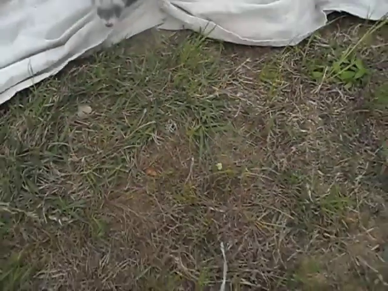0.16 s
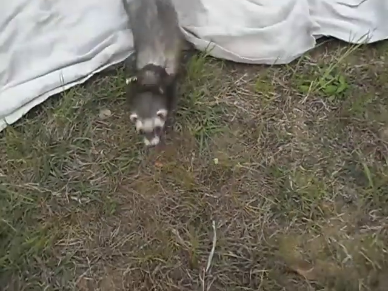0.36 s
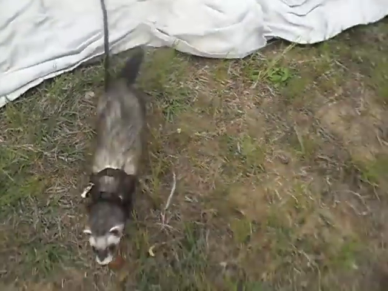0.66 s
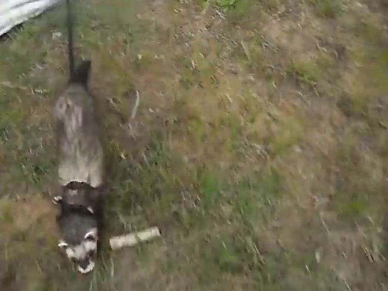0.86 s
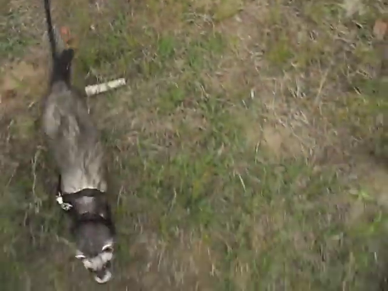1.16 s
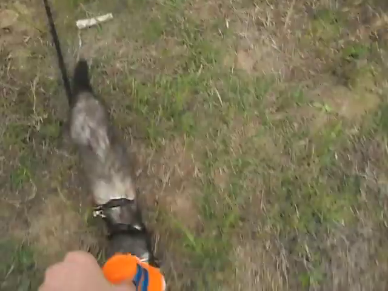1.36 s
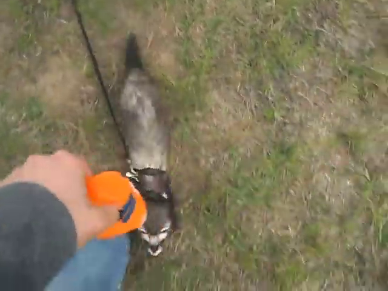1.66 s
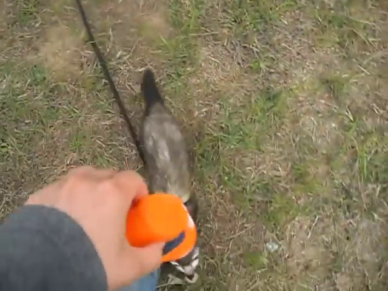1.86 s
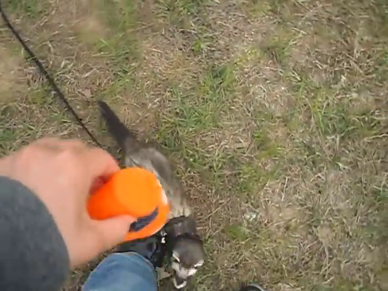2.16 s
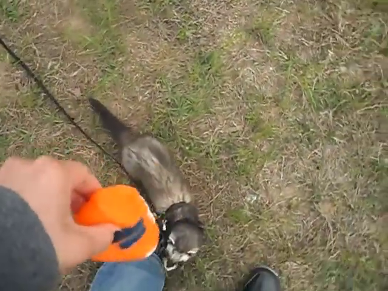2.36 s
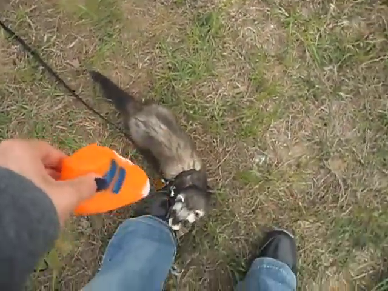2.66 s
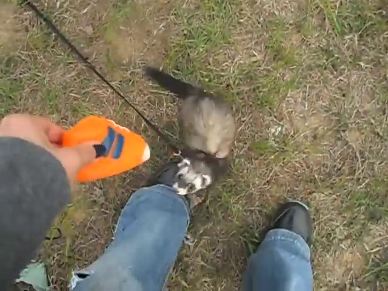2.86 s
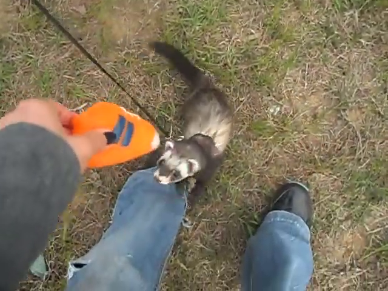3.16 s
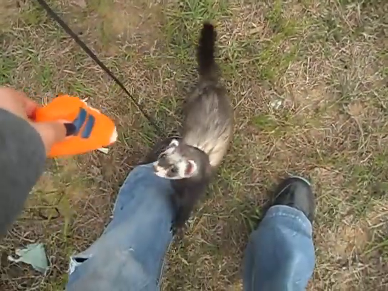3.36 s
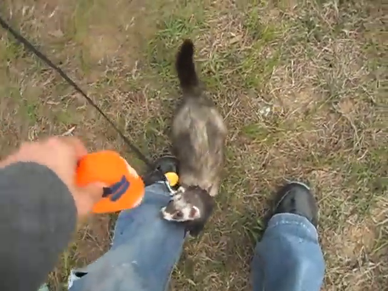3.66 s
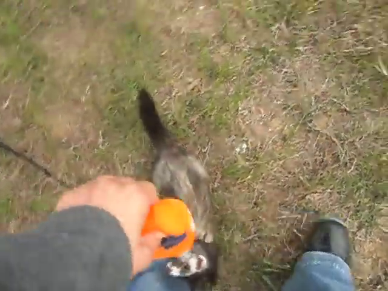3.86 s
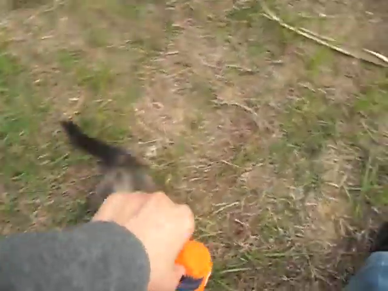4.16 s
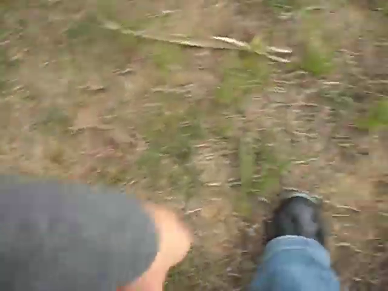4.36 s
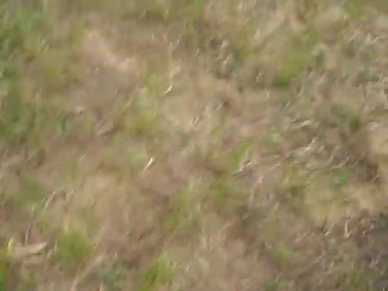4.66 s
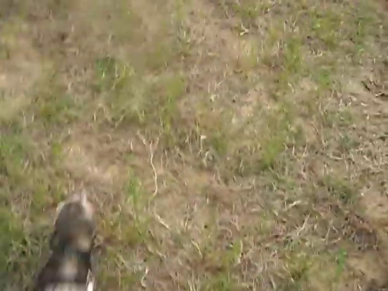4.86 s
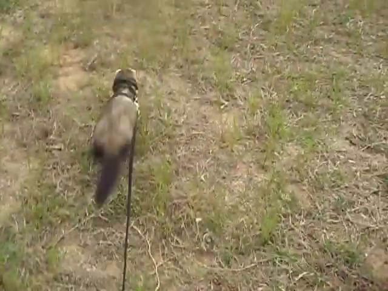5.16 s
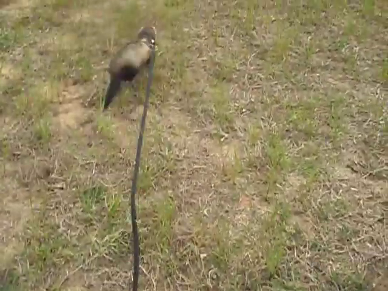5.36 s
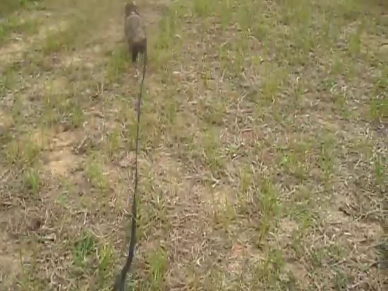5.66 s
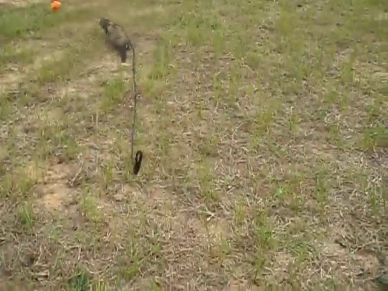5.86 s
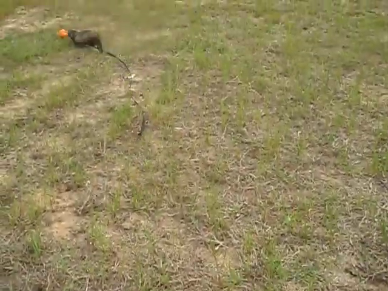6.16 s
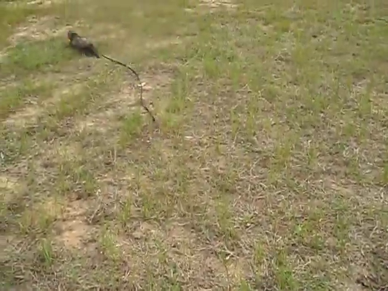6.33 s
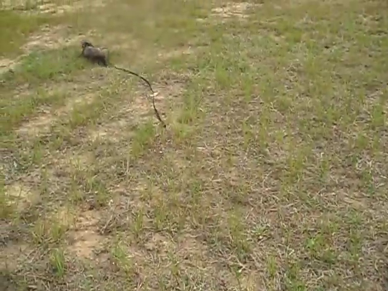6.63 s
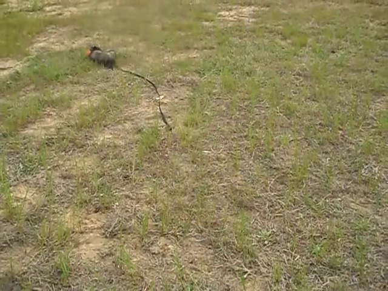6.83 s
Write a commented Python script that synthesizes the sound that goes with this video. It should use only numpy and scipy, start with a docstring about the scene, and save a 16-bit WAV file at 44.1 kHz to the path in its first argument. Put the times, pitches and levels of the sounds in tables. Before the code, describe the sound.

Outdoors on dry grass, light wind bumps and rumbles at a close microphone throughout. At 0.3 s a rubber toy gives a single short, nasal squeak as it draws in air. From 0.5 to 1.1 s clothing swishes, grass crunches and a ferret's tiny bell tinkles faintly, with a very weak squeak near 0.9. At about 1.2 s rapid squeezing begins: brief, bright, reedy chirps, each followed by a slightly higher refill chirp, until 1.9 s. A short gap holds rustling, a tick and faint tinkles. From 2.5 to 4.8 s the paired squeaks return, several a second, with small ticks and soft bumps among them; the last refill squeak is longer and louder, sliding down. Around 5 s the bell and leash clip jingle quickly as the animal trots off. A hard, dry click lands at 5.4 s, then bumps, sparse tinkles, grass rustle and wind fade on to the end, near 7 s.

```python
"""Outdoors on dry grass, close to the microphone, in light wind that bumps it from start to end.
First a rubber toy's reed squeaks as air flows back in; then grass and clothes rustle and a ferret's bell tinkles.
From about 1.2 to 4.8 s the toy is squeezed over and over: a squeak on each squeeze, a higher one on each refill.
Small ticks and soft bumps fall among them. After the last squeak the bell tinkles on, and near 5.4 s
a hard click sounds; rustling and wind remain."""
import sys
import numpy as np
from scipy import signal
from scipy.fft import rfft, irfft
from scipy.io import wavfile
from scipy.ndimage import uniform_filter1d

SR = 44100
rng = np.random.default_rng(int(sys.argv[2]) if len(sys.argv) > 2 else 0)


def log_audio(samples):
    """Write samples as a 16-bit WAV file to the path given in sys.argv[1]."""
    # one column per channel
    frames = np.atleast_2d(samples).T
    # limit to full scale, then quantise
    limited = np.clip(frames, -1, 1)
    pcm = np.round(limited * 32767).astype(np.int16)
    wavfile.write(sys.argv[1], SR, pcm)


N = 308323
TIME = np.arange(N) / SR  # s

# Faint air of the open place, far off. Each row: frequency in Hz, relative level in dB.
AIR_SPECTRUM = [(150, 2.5), (300, -1), (500, -3), (700, -5), (810, 2.5), (950, -6.5), (1500, -10),
                (3000, -15), (6000, -16.5), (10200, -20), (12500, -24.5)]
# Deep wind rumble at the microphone. Each row: frequency in Hz, relative level in dB.
RUMBLE_SPECTRUM = [(4, -45), (15, -0.5), (30, 10), (55, 1.5), (80, -9), (160, -43), (1000, -100)]
# Wind flutter at the microphone, higher than the rumble. Each row: frequency in Hz, relative level in dB.
FLUTTER_SPECTRUM = [(20, -47), (45, -9.5), (80, 4), (120, -2), (200, -6.5), (300, -18.5), (600, -66),
                    (3000, -99)]
# Eddies striking the microphone. Each row: start in seconds, length in seconds, rumble in dB, flutter in dB.
GUSTS = [(0.362, 0.12, -50.5, -59), (2.173, 0.113, -56, -70), (2.703, .09, -48, -57.5),
         (2.795, .14, -52, -58.5), (3.31, 0.094, -52, -60), (3.678, 0.072, -46, -47.5),
         (3.926, 0.215, -46.5, -56), (4.197, 0.068, -48, -63), (5.217, 0.11, -46.5, -59),
         (5.476, 0.12, -48.5, -57.5), (5.6, 0.14, -45, -75), (5.873, 0.17, -44, -62),
         (6.312, 0.23, -49, -75)]
AIR_START_DB, RUMBLE_REST_DB = -65, -57.5
FLUTTER_START_DB, FLUTTER_REST_DB, FLUTTER_SETTLE_S = -54, -63.5, 2.53

# Rubbing cloth. Each row: frequency in Hz, relative level in dB.
CLOTH_SPECTRUM = [(100, -6), (250, -2), (500, -1), (1000, -0.5), (2000, -9.5), (4000, -24.5),
                  (10000, -26.5), (12000, -55)]
# Dry blades snapping. Each row: frequency in Hz, relative level in dB.
GRASS_SPECTRUM = [(300, -28.5), (1000, -13), (2500, 5), (4000, 2.5), (7000, 5), (10200, 2.5)]
# Sleeves and trouser legs swish. Each row: start in seconds, length in seconds, level before trim in dB.
SWISHES = [(0, .22, -71.5), (.47, 0.12, -70), (.76, .14, -59.5), (.9, 0.064, -64), (1.24, 0.33, -69.5),
           (1.748, 0.072, -52), (1.8, 0.15, -64.5), (1.96, 0.28, -60.5), (3.74, 0.045, -62.5),
           (4.02, 0.15, -70), (4.42, 0.185, -68), (4.85, 0.275, -86), (5.25, 0.061, -78),
           (5.43, 0.053, -65)]
# Grass crunches under a foot or the leash. Each row: start in seconds, length in seconds, level before trim in dB.
CRUNCHES = [(.488, 0.026, -53), (.61, 0.033, -64), (.77, 0.21, -72), (1.955, 0.1, -58.5),
            (2.07, 0.1157, -64), (3.742, 0.0406, -57.5), (4.42, 0.066, -62.5), (4.986, 0.021, -50.5),
            (5.048, 0.037, -62), (5.255, 0.039, -57), (5.45, 0.036, -70.5), (5.65, 0.0485, -66),
            (5.8, 0.07, -68), (6.03, .08, -69), (6.55, .06, -79.5)]
CLOTH_REST_DB, GRASS_REST_DB = -78.5, -81.5  # the faint stir in between
GRAINS_PER_S, SWISH_UNREST_DB = 2000, 1.5

# Hard ticks and clicks by the microphone. Each row: start in seconds, tick peak in dB, low knock peak in dB.
TICKS = [(0.5314, -40.5, -66.5), (1.1533, -32, -48.5), (2.008, -34.5, -58), (2.416, -62.5, -44),
         (3.749, -34, -43), (4.43, -45, -66), (4.459, -38, -64), (5.3914, -24.5, -30.5),
         (5.3923, -32.5, -43), (5.3944, -33, -43.5)]
# Bright plastic modes of a tick. Each row: frequency in Hz, relative level in dB, 60 dB decay in seconds.
TICK_MODES = [(2160, -14, 0.0093), (3700, -2, 0.0009), (5390, 1.5, 0.0034), (6240, 2.5, 0.00654),
              (7130, -5, 0.0032), (9500, -29, 0.0033)]
# Low modes of the knock under it. Each row: frequency in Hz, relative level in dB, 60 dB decay in seconds.
KNOCK_MODES = [(170, -11.5, 0.0079), (358, 19, 0.005), (590, 0.5, 0.017), (1170, -5, 0.021)]
# Soft bumps of the hand-held microphone. Each row: start in seconds, peak in dB.
BUMPS = [(2.733, -39), (3.714, -33.5), (4.049, -37.5), (4.125, -39.5), (5.509, -37.5), (5.659, -49),
         (5.985, -40.5)]
# Dull modes of a bump. Each row: frequency in Hz, relative level in dB, 60 dB decay in seconds.
BUMP_MODES = [(71.4, 30, 0.077), (122, -15, 0.074)]

# The ferret trots and its harness trembles. Each row: start in seconds, length in seconds, bell peak in dB.
TROTS = [(0.544, 0.73, -73.5), (1.902, 0.49, -66), (4.847, 0.41, -67.5), (5.406, 1, -68.5)]
# The clearest bell strikes. Each row: start in seconds, peak of the ringing in dB.
JINGLES = [(0.631, -51), (0.7677, -61), (0.842, -52), (1.0967, -53), (2.0592, -57), (4.9615, -56.5),
           (5.0028, -45.5), (5.0559, -52), (5.104, -53), (5.2172, -51), (5.2726, -48.5), (5.46, -46.5),
           (5.6263, -55), (5.8735, -59), (6.1499, -60)]
# The leash clip clinks. Each row: start in seconds, peak of the ringing in dB.
CLINKS = [(0.5846, -63), (0.8719, -64), (1.077, -61.5), (3.7188, -49), (5.029, -56), (5.4444, -64),
          (5.6156, -63), (5.7536, -60.5), (6.22, -56)]
# Modes of the tiny bell. Each row: frequency in Hz, relative level in dB, 60 dB decay in seconds.
BELL_MODES = [(6300, -35.5, .06), (7080, -8, 0.062), (8050, -25, 0.054), (9100, -21.5, 0.046)]
# Modes of the leash clip. Each row: frequency in Hz, relative level in dB, 60 dB decay in seconds.
CLIP_MODES = [(6050, -9.5, 0.058), (6780, -15.5, 0.043)]
JOLTS_PER_S = 18

# The toy is squeezed. Each row: start in seconds, length in seconds, top pitch in Hz, moment of top pressure 0-1,
# pitch fall 0-1, level before trim in dB, tilt in dB per octave, reflection delay in ms, reflection share 0-1,
# notch in Hz, notch depth in dB.
SQUEEZES = [(1.157, 0.093, 827.4, 0.29, 0.17, -44, 2.05, 0.096, 0.62, 7410.0, 2.5),
            (1.41, 0.07, 811.6, 0.19, 0.11, -45, 2.0, 0.13, 0.64, 6520.0, 10.5),
            (1.639, 0.068, 814.3, 0.23, 0.11, -41.5, 1.8, 1.1, 0.2, 3100, 10.5),
            (2.503, 0.06634, 799.6, 0.2, 0.09, -42.5, 2.5, 0.13, 0.5, 6670, 12),
            (2.7665, 0.062, 796, 0.16, 0.1, -42.5, 1.6, 0.296, 0.33, 2900.0, 11.5),
            (3.2595, 0.0739, 810.5, 0.21, 0.1, -42, 3, 1.13, 0.16, 5420, 3),
            (3.524, 0.056, 798.4, 0.17, 0.1, -42.5, 2, 0.842, 0.44, 1970, 7),
            (3.774, 0.0665, 802.5, 0.2, 0.1, -41.5, 2, 0.84, 0.12, 3224, 12.5),
            (4.077, 0.07694, 805.1, 0.28, 0.11, -44, 0.5, 0.51, 0.2, 5940, 13.5),
            (4.346, 0.077, 821, 0.29, 0.14, -42.5, 1, 0.34, 0.26, 5497, 8)]
# A half-hearted squeeze. Each row: start in seconds, length in seconds, top pitch in Hz, moment of top pressure
# 0-1, pitch fall 0-1, level before trim in dB, tilt in dB per octave, reflection delay in ms,
# reflection share 0-1, notch in Hz, notch depth in dB.
NUDGES = [(.944, 0.0338, 733.2, 0.215, 0.042, -59, -4.5, 0.463, 0.53, 4400, 5.7)]
# The toy draws air back in. Each row: start in seconds, length in seconds, top pitch in Hz, moment of top pressure
# 0-1, pitch fall 0-1, level before trim in dB, tilt in dB per octave, reflection delay in ms,
# reflection share 0-1, notch in Hz, notch depth in dB.
REFILLS = [(0.3065, 0.091, 947, 0.25, 0.18, -41, -1.42, 0.65, 0.21, 3095, 18),
           (1.2955, 0.065, 979, 0.29, 0.13, -42.5, 0.7, 0.07, 0.41, 4840, 3.6),
           (1.5265, 0.063, 977, 0.31, 0.072, -41, 0.4, 0.13, 0.51, 8885, 9.3),
           (1.7555, 0.14, 984, 0.2, 0.15, -39, -0.8, 0.65, 0.23, 2883, 14.5),
           (2.644, 0.058, 955, 0.16, 0.11, -42.5, 0.1, 0.3, 0.626, 2950, 15),
           (2.8935, 0.0584, 962, 0.256, 0.11, -39.5, -2, 0.4705, 0.46, 1980, 23.5),
           (3.1485, 0.057, 955, 0.27, 0.1, -41.3, 2.5, 0.065, 0.46, 1816, 13.4),
           (3.4005, 0.0586, 969.6, 0.24, 0.097, -39, -0.6, 0.78, 0.17, 1510, 28),
           (3.6465, 0.0681, 967, 0.26, 0.088, -41, 1.3, 1.208, 0.28, 2000, 13),
           (3.9035, 0.085, 980, 0.26, 0.118, -41.5, 1.5, 0.83, 0.46, 3962, 22.5),
           (4.2095, 0.0963, 986, 0.3, 0.13, -42.5, 0.5, 1.056, 0.38, 7100, 16),
           (4.4765, 0.072, 960.4, 0.18, 0.073, -42, -0.9, 0.89, 0.51, 5000, 26),
           (4.7095, 0.13, 986.6, 0.0355, 0.15, -35.5, 0.5, 0.85, 0.17, 3720, 9.7)]
# Colour of the reed with air going out. Each row: frequency in Hz, level in dB.
OUT_SPECTRUM = [(800, 1.2), (1600, -3), (2400, -6), (3200, -7.1), (4000, -7), (4800, -2.3), (5600, 5),
                (6400, 1), (7200, -9.5), (7900, -14.5), (8500, -17.5), (10300, -25.5), (12500, -30)]
# Colour of the reed with air coming in. Each row: frequency in Hz, level in dB.
IN_SPECTRUM = [(900, -3), (1900, -6.5), (2900, -10), (3900, -7.5), (4800, -10.5), (5700, -16), (6900, -14),
               (7700, -16), (8350, -18), (8900, -15), (9450, -22), (9850, -19), (12500, -36)]
WAVER_DB, RIPPLE_DB = 1.6, 6
JITTER = 0.0012  # share of the pitch
BLOOM = 0.35  # how strongly a small swing loses its overtones

# High treble of the microphone. Each row: frequency in Hz, gain in dB.
MICROPHONE_RESPONSE = [(10200, 0), (11100, -16), (12500, -14)]
TOP_HZ = 12100


def undb(db):
    """Decibels to gain."""
    return 10 ** (np.asarray(db) / 20)


def unit(x):
    """Scale to rms 1."""
    return x / np.sqrt(np.mean(x ** 2))


def add(out, s, sound):
    """Mix a sound in at time s."""
    i = int(s * SR)
    out[i:i + len(sound)] += sound[:N - i]


def gain_at(points, hz):
    """Read a (Hz, dB) spectrum as gain on a log-frequency axis."""
    f, db = np.transpose(points)
    return undb(np.interp(np.log(np.maximum(hz, 1)), np.log(f), db))


def equalize(x, points):
    """Filter by a (Hz, dB) spectrum without shifting phase."""
    return irfft(rfft(x) * gain_at(points, np.fft.rfftfreq(N, 1 / SR)), N)


def colour(x, points):
    """Shape a signal by a spectrum; rms 1."""
    return unit(equalize(x, points))


def causal(points, size=2048):
    """Frequencies and minimum-phase response of a passive resonator with this spectrum."""
    hz = np.fft.rfftfreq(size, 1 / SR)
    # folding the cepstrum forward makes the response causal
    cepstrum = irfft(np.log(gain_at(points, hz)))
    cepstrum[1:size // 2] *= 2
    cepstrum[size // 2 + 1:] = 0
    return hz, np.exp(rfft(cepstrum))


def walk(rate, count=N):
    """Smooth random wander with rms 1, taking rate steps a second."""
    k = max(int(SR / rate), 1)
    steps = np.repeat(rng.standard_normal(count // k + 1), k)
    return unit(uniform_filter1d(uniform_filter1d(steps, k), k)[:count])


def ring(modes, length=.4):
    """Decaying modes after one blow, peak 1."""
    t = np.arange(int(length * SR)) / SR
    y = sum(undb(db - 60 * t / t60) * np.sin(2 * np.pi * hz * t) for hz, db, t60 in modes)
    return y / np.abs(y).max()


def ramps(t, length, attack_s, release_s):
    """Straight rise, hold and straight fall."""
    return np.minimum(t / attack_s, 1) * np.minimum((length - t) / release_s, 1)


def swells(table, attack_s, release_s):
    """Gain over time for rows (s, length s, dB): each rises, holds and falls away; overlaps add in power."""
    power = np.zeros(N)
    for s, length, db in table:
        t = TIME[:int(length * SR)]
        add(power, s, (undb(db) * ramps(t, length, attack_s, release_s)) ** 2)
    return np.sqrt(power)


def outdoors(fade_db=2, unrest_db=0.66):
    """A light breeze and its eddies buffet the microphone over a faint distant background that slowly sinks."""
    breeze = undb(unrest_db * walk(7))
    # the steady flutter dies down towards its resting level
    settling_db = FLUTTER_REST_DB + (FLUTTER_START_DB - FLUTTER_REST_DB) * np.exp(-TIME / FLUTTER_SETTLE_S)
    rumble_gusts = swells([(s, length, db) for s, length, db, _ in GUSTS], attack_s=0.0205, release_s=0.028)
    flutter_gusts = swells([(s, length, db) for s, length, _, db in GUSTS], attack_s=0.06, release_s=.04)
    # gusts and steady breeze add in power
    rumble_gain = np.hypot(rumble_gusts, breeze * undb(RUMBLE_REST_DB))
    flutter_gain = np.hypot(flutter_gusts, breeze * undb(settling_db))
    rumble = rumble_gain * colour(rng.standard_normal(N), RUMBLE_SPECTRUM)
    flutter = flutter_gain * colour(rng.standard_normal(N), FLUTTER_SPECTRUM)
    air_db = AIR_START_DB - fade_db * TIME / TIME[-1] + .5 * walk(1.82)
    air = undb(air_db) * colour(rng.standard_normal(N), AIR_SPECTRUM)
    return rumble + flutter + air


def rustle(cloth_db=-2, grass_db=-1, grain_db=3):
    """Cloth swishes as wavering noise while dry blades snap in dense grains of very unequal size."""
    sizes = undb(grain_db * np.minimum(rng.exponential(size=N), 5))
    snaps = rng.random(N) < GRAINS_PER_S / SR
    grass = colour(rng.standard_normal(N) * sizes * snaps, GRASS_SPECTRUM)
    cloth = colour(rng.standard_normal(N) * undb(SWISH_UNREST_DB * walk(150)), CLOTH_SPECTRUM)
    swish = undb(CLOTH_REST_DB) + undb(cloth_db) * swells(SWISHES, attack_s=0.004, release_s=0.0396)
    crackle = undb(GRASS_REST_DB) + undb(grass_db) * swells(CRUNCHES, attack_s=0.0053, release_s=0.016)
    return swish * cloth + crackle * grass


def handling():
    """Short plastic ticks with a knock under them, and dull bumps, all as decaying modes."""
    out = np.zeros(N)
    for s, db, knock_db in TICKS:
        add(out, s, undb(db) * ring(TICK_MODES) + undb(knock_db) * ring(KNOCK_MODES))
    for s, db in BUMPS:
        add(out, s, undb(db) * ring(BUMP_MODES))
    return out


def tremble(clip_db=-3):
    out, bell, clip = np.zeros(N), ring(BELL_MODES), undb(clip_db) * ring(CLIP_MODES)
    for s, length, db in TROTS:
        for when, which in rng.random((int(length * JOLTS_PER_S), 2)):
            struck = bell if which < 2 / 3 else clip
            add(out, s + when * length, undb(db) * struck)
    return out


def harness(contact_db=-10, contact_s=0.005, rattle_db=-8, rattle_s=0.012):
    """A tiny bell and the leash clip are jolted as the ferret moves; each contact ticks, then rattles on."""
    out = np.zeros(N)
    for table, modes in ((JINGLES, BELL_MODES), (CLINKS, CLIP_MODES)):
        tone = ring(modes)
        for s, db in table:
            contact = rng.standard_normal(len(tone)) * np.exp(-TIME[:len(tone)] / contact_s)
            add(out, s, undb(db) * (tone + undb(contact_db) * contact))
            # two weaker blows follow at uneven gaps
            for lag in rattle_s * np.cumsum(.5 + rng.random(size=2)):
                add(out, s + lag, undb(db + rattle_db) * tone)
    return out


def ground(x, lag_s=0.0011, decay_s=0.00706, scatter_db=-19):
    """Turf and legs scatter a weak, very short echo."""
    t = TIME[:SR // 20]
    echo = rng.standard_normal(len(t)) * np.exp(-t / decay_s) * (t > lag_s)
    return x + undb(scatter_db) * signal.fftconvolve(x, echo / np.linalg.norm(echo))[:N]


def precede(table, low_hz, below_db, lead_s, length_s=0.016):
    """Just before each squeak a soft low tone swells briefly, already rising in pitch."""
    out, t = np.zeros(N), TIME[:int(length_s * SR)]
    pitch = low_hz * (1 + 0.23 * (t / length_s) ** 3)
    wobble = np.hanning(len(t)) * np.sin(2 * np.pi * np.cumsum(pitch) / SR)
    for s, _, _, _, _, db, *_ in table:
        add(out, s - lead_s, undb(db + below_db) * wobble)
    return out


def reed(table, spectrum, flow, attack_s, release_s, scoop, scoop_s, sag_db, dull_db, bend, hiss_db, trim_db=0.5):
    """A reed chops the air once a cycle; sagging pressure makes it flat and soft and shifts its overtones.

    flow is the air's direction; dull_db lowers the overtones per octave as the air runs out, or lifts them if negative.
    """
    out, k = np.zeros(N), np.arange(1, 17)[:, None]  # k: harmonic numbers
    grid, body = causal(spectrum)
    for s, length, top_hz, crest, fall, db, tilt_db, delay_ms, share, notch_hz, notch_db in table:
        t = np.arange(int(length * SR)) / SR
        # an early pressure crest gives a long, straighter slide
        from_crest = np.abs((t / length - crest) / (1 - crest))
        sag = fall * from_crest ** max(bend + 3 * crest, 1)
        # past the crest the air runs out
        spent = sag * (t > crest * length)
        # the pitch scoops up while the swing builds, and drops as it dies
        slack = scoop * np.exp(-t / scoop_s) + 0.23 * np.exp((t - length) / 0.0039)
        pitch = top_hz * (1 - sag - slack) * (1 + JITTER * walk(770, count=len(t)))
        hz, phase = k * pitch, 2 * np.pi * np.cumsum(pitch) / SR
        rise = np.sin(np.pi / 2 * np.minimum(t / attack_s, 1))
        swing = rise * np.minimum((length - t) / release_s, 1)
        # a reflection off the hand combs the harmonics differently at each grip
        comb = 1 + share * np.exp(-2j * np.pi * hz * delay_ms / 1000)
        # the hollow of the fingers swallows one narrow band
        notch = undb(-notch_db / (1 + ((hz - notch_hz) / 300) ** 2))
        # the reed seats unevenly, so its overtones waver, the high ones most
        wander = walk(55, count=k.size * len(t)).reshape(k.size, -1)
        waver = WAVER_DB * np.sqrt(k / 10) * wander
        # narrow resonances of the hollow toy shift with each grip; sliding overtones flicker through them
        resonances = np.interp(hz, 220 * np.arange(80), rng.standard_normal(80))
        ripple = RIPPLE_DB * np.minimum(hz / 8000, 1) ** 2 * resonances
        flicker = waver + ripple - ripple.mean(axis=1, keepdims=True)
        # a small swing is nearly a sine; only a full swing slaps shut
        shade_db = tilt_db * np.log2(hz / 3000) - dull_db * spent * np.log2(k) + flicker
        shade = undb(shade_db) * swing ** (BLOOM * np.log2(k))
        harmonics = np.interp(hz, grid, body) * comb * notch * shade * np.exp(1j * k * phase)
        tone = np.real(harmonics).sum(axis=0)
        # escaping air hisses in puffs, once a cycle
        breath = signal.fftconvolve(rng.standard_normal(len(t)), irfft(body))[:len(t)]
        hiss = undb(hiss_db) * (1 + np.cos(phase)) * breath
        level = swing * undb(db + trim_db - sag_db * spent)
        add(out, s, (np.sign(flow) * tone + hiss) * level)
    return out


def toy():
    """The reed snaps into tone when squeezed and scoops up more gently as the toy refills."""
    pushed = reed(list(SQUEEZES) + list(NUDGES), OUT_SPECTRUM, flow=-1, attack_s=0.0043, release_s=0.014,
                  scoop=0.037, scoop_s=0.0018, sag_db=68, dull_db=-3, bend=1.25, hiss_db=-24.5)
    drawn = reed(REFILLS, IN_SPECTRUM, flow=1, attack_s=0.0078, release_s=0.0085,
                 scoop=0.399, scoop_s=0.00185, sag_db=63, dull_db=32.5, bend=1.49, hiss_db=-19.0)
    return ground(pushed + drawn)


def scene():
    """Everything but the faint distant air is close and dry in the open, on one channel."""
    background = outdoors() + rustle() + handling()
    animal = tremble() + harness()
    lead_in = precede(SQUEEZES, low_hz=665.4, below_db=-22.5, lead_s=0.0092)
    lead_in += precede(REFILLS, low_hz=651, below_db=-13.5, lead_s=0.0076)
    return (background + animal + lead_in + toy())[None]


def record(dry):
    """The small microphone drops off steeply in the high treble, and the top is cut."""
    dull = equalize(dry, MICROPHONE_RESPONSE)
    return signal.sosfilt(signal.ellip(8, .2, 70, TOP_HZ, fs=SR, output="sos"), dull)


dry = scene()
out = record(dry)
log_audio(out)
```